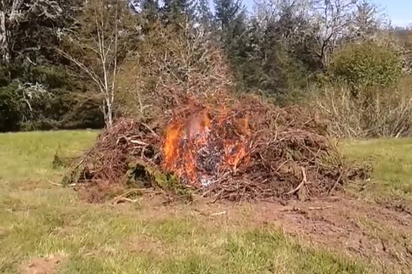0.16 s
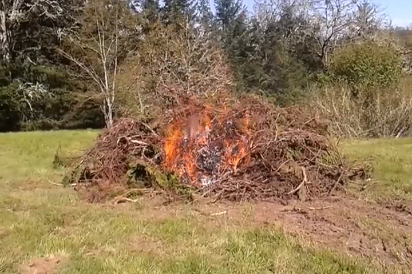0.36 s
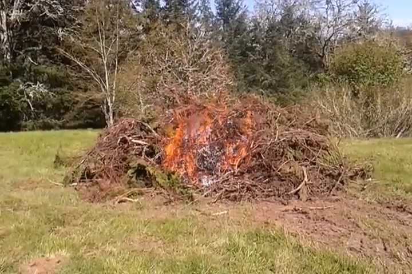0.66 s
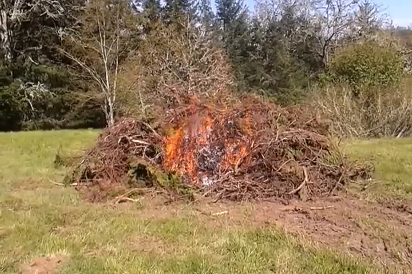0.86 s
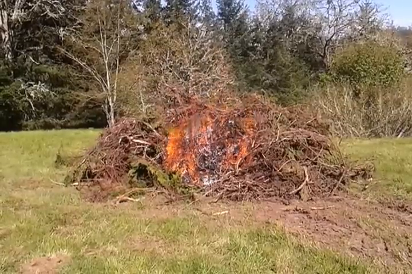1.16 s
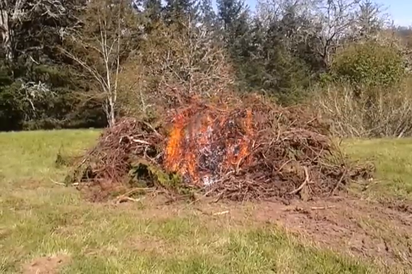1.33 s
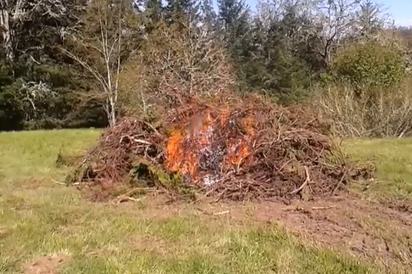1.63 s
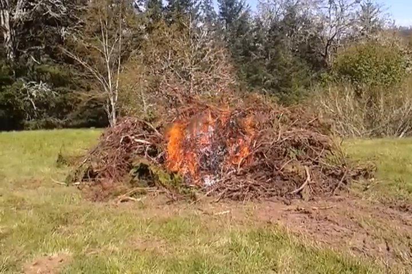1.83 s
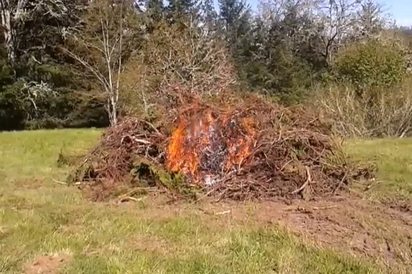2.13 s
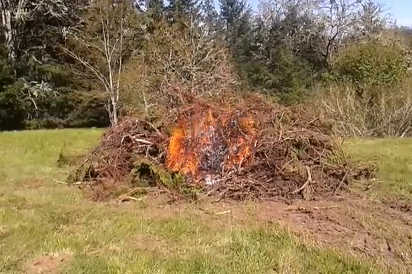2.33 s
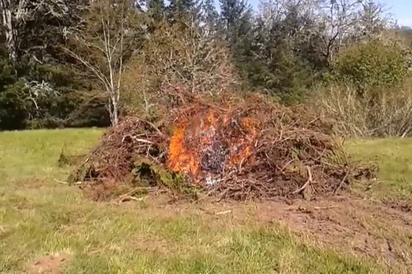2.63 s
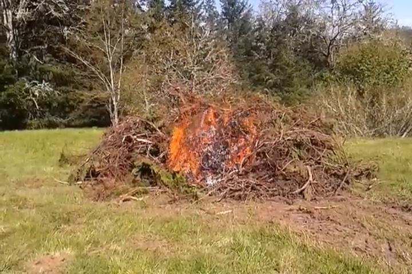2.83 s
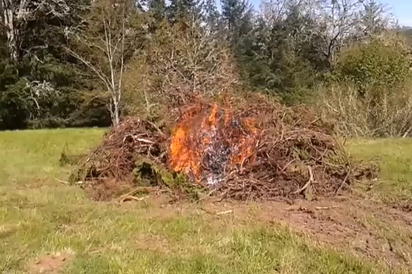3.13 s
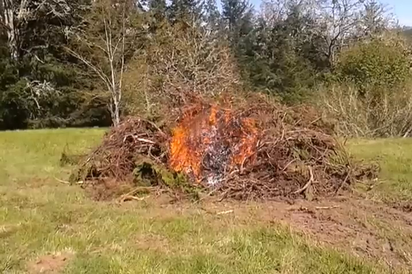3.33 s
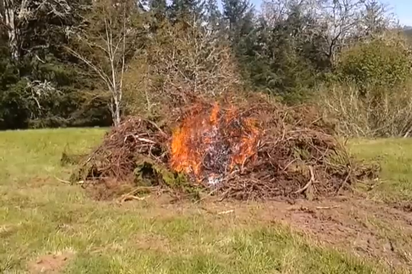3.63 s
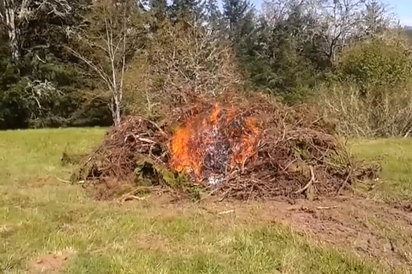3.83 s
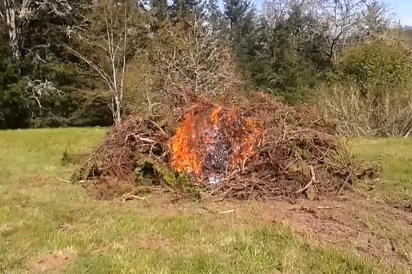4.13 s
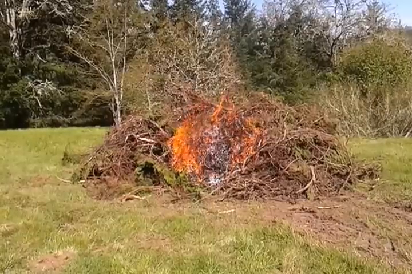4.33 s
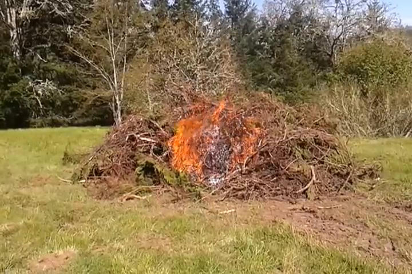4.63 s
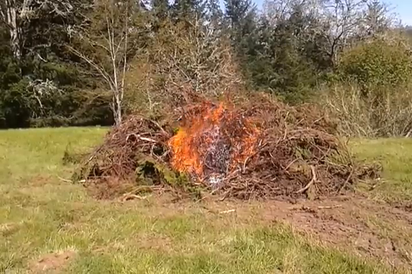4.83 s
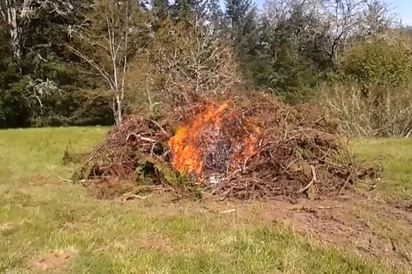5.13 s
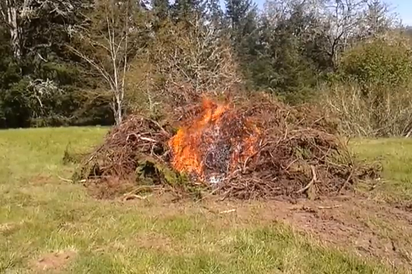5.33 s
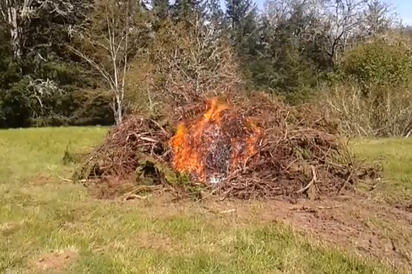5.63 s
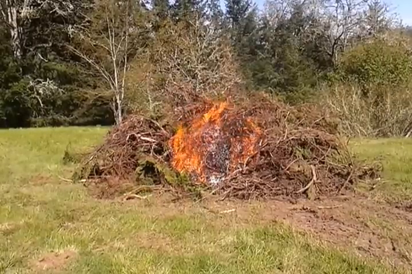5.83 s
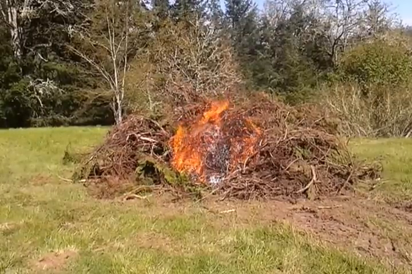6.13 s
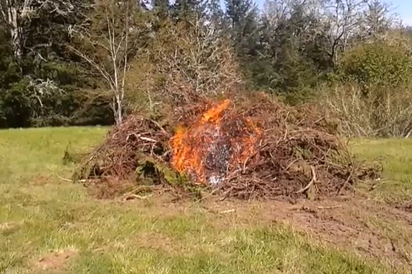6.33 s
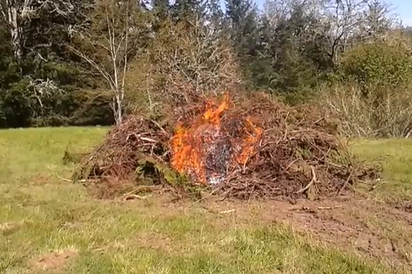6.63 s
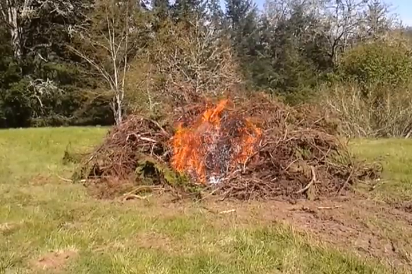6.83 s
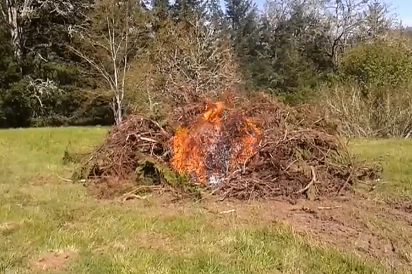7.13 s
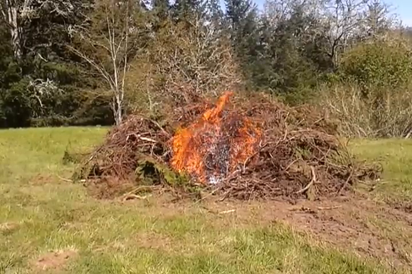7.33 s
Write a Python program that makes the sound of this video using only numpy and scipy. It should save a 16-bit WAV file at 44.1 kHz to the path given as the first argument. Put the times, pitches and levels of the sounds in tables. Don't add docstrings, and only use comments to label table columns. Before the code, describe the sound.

A large pile of green brushwood burns in a meadow, heard from several metres through a small microphone, dry and open with little deep bass and softened, cut-off treble. Throughout, a grainy, flickering hiss of needles and a soft low flame roar carry dense tiny ticks and faint distant crackles. Ragged pops, each only milliseconds long, come irregularly. From 0.6 to 1.6 s they crowd together, with a tiny high steam squeak at 0.8, a loud crack at 0.85 and a swell of hiss around 0.9. Medium snaps follow at 2.0 and 2.55-2.7, then a heavy, woody crack at 3.4. It is sparser around 4 s. A clear pop at 4.9 opens a busy patch of snaps and knocks until 5.7. Two strong cracks almost together at 6.3 and another at 6.67 lead to scattered light crackling until 7.45, with the roar slightly lower.

```python
import sys
import numpy as np
from scipy import signal
from scipy.io import wavfile
from scipy.ndimage import uniform_filter1d

SR = 44100
rng = np.random.default_rng(int(sys.argv[2]) if len(sys.argv) > 2 else 0)


def elevation(decibels):
    levels = np.asarray(decibels, float)
    return 10 ** (levels / 20)


def digitize_waveform(pressure):
    field = np.atleast_2d(pressure).T
    bounded = np.clip(field, -1, 1)
    quanta = np.round(bounded * 32767).astype(np.int16)
    wavfile.write(sys.argv[1], SR, quanta)


N = 328986


def at_hz(points, hz):
    table_hz, table_db = np.transpose(points)
    return np.interp(np.log(hz), np.log(table_hz), table_db)


def rms_one(x):
    return x / np.sqrt(np.mean(x ** 2) + 1e-20)


def band(x, low_hz, high_hz):
    return signal.sosfilt(signal.butter(2, [low_hz, high_hz], "band", fs=SR, output="sos"), x)


def high_pass(x, order, hz):
    return signal.sosfilt(signal.butter(order, hz, "high", fs=SR, output="sos"), x)


def drift(rate_hz):
    hop, settle = 40, 2000
    r = np.exp(-2 * np.pi * rate_hz * hop / SR)
    white = rng.standard_normal(N // hop + settle + 2)
    slow = signal.lfilter([1], [1, -2 * r, r * r], white)[settle:]
    return np.interp(np.arange(N) / hop, np.arange(len(slow)), rms_one(slow))


def coloured(sources, spectrum, patchy_db):
    edges_hz = 22 * 2 ** np.arange(0, 9.1, 0.5)
    out = 0
    for k, (low_hz, high_hz) in enumerate(zip(edges_hz, edges_hz[1:])):
        level_db = at_hz(spectrum, np.sqrt(low_hz * high_hz))
        gain = elevation(level_db + patchy_db * drift(17.4))
        out = out + gain * band(sources[k % len(sources)], low_hz, high_hz)
    return rms_one(out)


def ring(clicks, hz, t60_ms):
    r = elevation(-60000 / (t60_ms * SR))
    w = 2 * np.pi * hz / SR
    return signal.lfilter([0, np.sin(w)], [1, -2 * r * np.cos(w), r * r], clicks + 1e-18)


def every_pop():
    # t/s, level/dB, thick wood body/dB, tilt twig to needle/dB, tear/ms
    big_pops = [(0.6523, -30, -5, 1.6, 1.1), (0.7123, -26, 0, -1, 1.9), (0.7622, -29.3, -6.5, 1.5, 2.2),
                (0.8062, -40, -18.4, 6, 3.0), (0.852, -19.5, -1, -7.5, 1.64), (0.986, -29, 1, 1, 0.81),
                (1.0441, -30, -1, 7, 0.56), (1.1382, -33.5, 10, -12, 1.2), (1.2553, -29.0, -3, 7, 1.2),
                (1.498, -28, -4, -3.6, 3.1), (1.5581, -24.5, -3.0, -3, 3.3), (2.001, -29.5, -12, 3.5, 1.7),
                (2.5643, -27.1, -3.5, 0.5, 3.3), (2.7144, -26.5, -0.5, 0, 3.2),
                (3.3946, -19.5, 4, -1.4, 2.2), (3.8996, -31.5, -0.5, -2, 5.6),
                (4.8981, -23.5, -6.5, 1.5, 2.4), (4.9044, -34, -11, 2.5, 4), (5.092, -29.5, -5.1, -0.5, 3),
                (5.2099, -32.5, -5, 7, 3.7), (5.546, -30.5, -23, 6, 1.6), (6.3177, -22.5, -4, -0.9, 1),
                (6.3384, -20.5, -2.5, -4.5, 2.1), (6.6716, -27.5, -21, 0.5, 1.6)]
    # level/dB of thick wood, twig, bark, needle ranges
    big_colour_db = [-1, -1.5, 4.5, -0.06]
    # t/s, level/dB, tear/ms
    needle_pops = [(0.3493, -39.5, 1.4), (0.4458, -41, 0.65), (1.0554, -42, 2.5), (1.1917, -36, 0.77),
                   (1.2776, -40.3, 1.9), (1.7214, -44.5, 2.4), (1.7253, -41.1, 2.2), (2.1271, -41, 1.7),
                   (2.3183, -43.5, 1.3), (2.367, -39, 1.4), (2.4162, -44.8, 2.5), (2.551, -38.2, 1.1),
                   (3.3213, -39.9, 1.3), (3.345, -40.5, 3), (3.3602, -40.5, 1.6), (3.5117, -38.3, 1.6),
                   (4.1499, -35.5, 0.87), (4.3273, -45, 2.0), (4.4768, -48, 5.3), (4.6678, -39.5, 1.6),
                   (5.5645, -46.5, 3.5), (6.1499, -36.5, 1.1), (6.2105, -39.5, 2.8), (6.222, -38.5, 1.4),
                   (6.2341, -45, 4.0), (6.481, -44, 1.3), (6.9663, -39.5, 1.3), (6.9925, -40.5, 5.5),
                   (7.01, -44, 1.3), (7.4278, -35.5, 2.5)]
    # t/s, level/dB, tear/ms
    bark_pops = [(0.208, -38, 2.0), (0.2694, -41.5, 1.5), (0.5712, -40.5, 2.4), (0.7194, -51, 2.8),
                 (0.88, -35, 1.1), (1.0945, -42, 1.9), (1.6363, -37, 6.8), (2.148, -42, 0.74),
                 (2.4266, -41.5, 1.8), (2.4428, -39, 2.4), (2.4653, -35.2, 2.1), (2.496, -41.5, 1.6),
                 (2.5759, -33, 1.2), (3.1296, -38, 1.9), (3.477, -39.7, 1.3), (4.0005, -43, 2.5),
                 (4.1991, -44.5, 2.3), (5.2182, -35.5, 3.0), (5.2544, -41, 1.4), (5.429, -40, 2.0),
                 (5.4682, -40, 3.8), (5.6687, -45, 2.0), (5.9531, -38.5, 0.82), (5.9827, -40.7, 1.6),
                 (6.0032, -36.5, 1.9), (6.185, -40, 2.1), (6.4595, -38.5, 3), (6.8672, -43, 3.5),
                 (6.9133, -42.5, 5.9), (7.3674, -44, 2.7)]
    # t/s, level/dB, tear/ms
    twig_pops = [(0.1733, -39, 1.9), (0.1929, -32, 1.9), (0.3666, -32, 4.2), (0.3983, -33, 2.9),
                 (0.5147, -35, 1.9), (0.5265, -32.5, 1.4), (0.5526, -40.4, 2.1), (0.844, -31, 1.6),
                 (1.1778, -33, 1.3), (1.4017, -36, 2.1), (1.6519, -34, 1.9), (1.6739, -36, 1.6),
                 (2.0894, -38.5, 2.6), (2.7762, -37.5, 2.1), (3.1354, -31, 1.6), (3.7926, -37, 2.7),
                 (4.3092, -35.7, 2.3), (4.3463, -33, 2.7), (4.7257, -36, 1.7), (5.1497, -35.5, 2.1),
                 (5.2824, -36.5, 2.7), (5.3315, -35.5, 1.5), (5.3992, -35, 1.9), (5.5564, -33, 2.3),
                 (5.648, -37, 2.5), (6.2018, -36, 1.8), (6.6516, -31.5, 1.5), (6.9211, -32, 4.3),
                 (7.2284, -35.5, 1.7), (7.3427, -33, 2.1)]
    # t/s, level/dB, tear/ms
    branch_pops = [(0.5978, -48, 2.6), (0.9091, -42, 1.3), (1.2644, -37, 1.9), (1.6438, -38, 1.2),
                   (1.852, -34.5, 2.4), (2.6906, -35, 1.7), (3.4186, -40.6, 2.8), (3.8578, -38.5, 1.6),
                   (4.3035, -38.5, 5.2), (4.7422, -43, 1), (4.7784, -47, 2.1), (4.9115, -36, 1.4),
                   (4.9689, -37.5, 2.3), (4.9752, -36.5, 2.8), (5.0992, -36, 2.1), (5.276, -46, 2.8),
                   (5.4203, -42, 1.3), (5.4779, -38, 1.9), (5.6069, -42.1, 1.8), (6.3986, -41.3, 1.4)]
    # thick wood/dB, twig/dB, bark/dB, needle/dB
    kind_colours = [
        (-8, -1.5, 9.5, 7),
        (0, -12.5, 7.5, 3.2),
        (-2.5, -0.5, 4.5, -0.2),
        (4, 1, 4.5, -0.5),
    ]
    # t/s, level/dB, brightness/dB
    sparks = [(0.1648, -41, 0), (0.6816, -44, 8), (1.0064, -55, 14), (1.0152, -39, 2.3), (1.7602, -42.5, 4),
              (1.801, -40.5, 1.5), (1.8476, -52, 6.0), (1.9062, -44, 4), (2.154, -45, -7),
              (2.348, -46.5, 8), (2.421, -40, 0), (2.5426, -42, 5.7), (2.6117, -41, 2), (2.747, -46, 7.5),
              (2.8728, -45.5, -3), (2.9636, -45.5, 3.5), (3.2977, -42, 2), (3.3145, -40, 1),
              (3.4322, -42, 4.5), (3.6203, -47, 9), (4.108, -41, 1.5), (4.5472, -40.5, 2),
              (4.889, -43, 2.3), (5.3411, -42.5, -1), (5.4556, -41, 2), (5.711, -48.5, 7),
              (6.0983, -42, -0.1), (6.4502, -47, 11), (6.8976, -41, 1), (7.395, -50, 11)]

    rows = []
    for s, db, body_db, tilt_db, tear_ms in big_pops:
        levels_db = db + np.add(big_colour_db, [body_db, -tilt_db, 0, tilt_db])
        rows.append((s, *levels_db, tear_ms))
    for kind, colour_db in zip([needle_pops, bark_pops, twig_pops, branch_pops], kind_colours):
        for s, db, tear_ms in kind:
            rows.append((s, *np.add(db, colour_db), 0.6 * tear_ms))
    for s, db, lift_db in sparks:
        dark_db, bright_db = db - lift_db, db + lift_db
        rows.append((s, dark_db, dark_db, bright_db + 2.5, bright_db - 1.5, 2.2))

    far_count, far_db, far_spread_db, far_tear_ms = 130, -47, 3, 0.86
    far_s = rng.random(far_count) * N / SR
    far_kind = rng.integers(0, 4, far_count)
    size, length = rng.standard_normal((2, far_count, 1))
    levels_db = far_db + far_spread_db * np.minimum(size, 1) + np.array(kind_colours)[far_kind]
    return np.vstack([rows, np.c_[far_s, levels_db, far_tear_ms * elevation(3.0 * length)]])


def pops(table):
    edges_hz = [600, 1650, 3100, 5800, 8600]
    range_db = [21.53, 19.3, 18.36, 26]
    tail_db, tail_ms, rise_ms = -16.5, 6.5, 0.037
    ragged_db, stretch, crack_db = 3.0, 0.93, 15.0

    ms = np.arange(1400) / SR * 1000
    draws = rng.standard_normal((len(table), 5, len(ms)))
    s, *levels_db, tear_ms = np.transpose(table)
    decay_ms = np.maximum(stretch * tear_ms, 0.3)[:, None]
    tear = np.exp(-(ms / decay_ms) ** 0.96)
    scatter = elevation(tail_db) * np.exp(-ms / tail_ms)
    ragged = elevation(ragged_db * rms_one(uniform_filter1d(draws[:, 4], size=18)))
    shape = (tear + scatter) * ragged * (1 - np.exp(-ms / rise_ms))
    crack = elevation(crack_db) * (ms == 0)
    bursts = 0
    for k, level_db in enumerate(levels_db):
        part = band(draws[:, k] * shape + crack, edges_hz[k], edges_hz[k + 1])
        gain = elevation(level_db + range_db[k]) / np.linalg.norm(part, axis=1)
        bursts = bursts + gain[:, None] * part
    out = np.zeros(N + len(ms))
    for start, burst in zip(np.round(s * SR).astype(int), bursts):
        out[start:start + len(ms)] += burst
    return high_pass(out[:N], 4, 520)


def stems():
    # t/s, f/Hz, level/dB, t60/ms
    stem_rings = [(.7123, 4050, -16.5, 12), (.8066, 8460, -9, 16), (.8522, 2700, -22, 7.9),
                  (.8522, 4080, -15, 11), (1.1385, 2700, -18.5, 12), (1.4992, 3600, -13, 5),
                  (1.5588, 4300, -27, 9.1), (5.0922, 4400, -25, 8), (7.228, 4220, -22, 8),
                  (2.7146, 3440, -9, 7.2), (3.3952, 1200, -29, 12), (3.9007, 1270, -29.5, 18),
                  (.2688, 5030, -26, 10), (4.8985, 685, -21, 16), (6.3395, 1410, -15.5, 15),
                  (4.8985, 4550, -11.5, 12), (4.8985, 5500, -25, 6), (6.3175, 2200, -18, 7.3),
                  (6.3395, 3870, -22, 8), (6.3395, 6360, -8, 8.7), (6.672, 4120, -27, 8)]
    out = 0
    for s, hz, level_db, t60_ms in stem_rings:
        knock = elevation(level_db) * (np.arange(N) == int(s * SR))
        out = out + ring(knock, hz, t60_ms)
    return high_pass(out, 2, 550)


def squeak():
    # f/Hz, level/dB, t60/ms
    steam_jet = (7520, -8.5, 24)
    hz, level_db, t60_ms = steam_jet
    start_s, blow_ms = 0.8063, 1.5
    since_ms = (np.arange(N) / SR - start_s) * 1000
    blowing = (since_ms > 0) * (since_ms < blow_ms)
    jet = ring(rng.standard_normal(N) * blowing, hz, t60_ms)
    return elevation(level_db) * jet / np.abs(jet).max()


def ticks(per_s=320.0, spread_db=2.5, clump_db=4.5, cycles=1.8, level_db=-53.5):
    sizes = elevation(spread_db * np.minimum(rng.exponential(1, N), 3.0)) * rng.choice([-1, 1], N)
    born = rng.random(N) < per_s * elevation(clump_db * drift(8)) / SR
    pitch = rng.integers(0, 10, N)
    snaps = 0
    for k, hz in enumerate(np.geomspace(1600, 8500, 10)):
        snaps = snaps + ring(sizes * born * (pitch == k), hz, cycles * 1000 / hz)
    return elevation(level_db) * rms_one(snaps)


def needles(per_s=700.0, spread_db=4.0, clump_db=5.0, last_ms=0.15, smooth_db=0.6):
    # f/Hz, level per Hz/dB
    hiss_spectrum = [(500, -11.5), (1000, 0), (2200, -6.5), (4000, 0.5), (5500, -4), (7000, 3.5),
                     (9000, -4.5)]
    sizes = elevation(spread_db * np.minimum(rng.exponential(1, N), 3.5))
    born = rng.random(N) < per_s * elevation(clump_db * drift(25)) / SR
    r = np.exp(-1000 / (last_ms * SR))
    power = signal.lfilter([1], [1, -r], sizes ** 2 * born + 1e-12)
    puffs = rms_one(np.sqrt(power))
    envelope = np.sqrt(puffs ** 2 + elevation(smooth_db) ** 2)
    return coloured(rng.standard_normal((2, N)) * envelope, hiss_spectrum, patchy_db=1.13)


def roar():
    # f/Hz, level per Hz/dB
    roar_spectrum = [(25, -38.5), (50, -20), (100, -6), (200, -0.5), (400, -3.5), (800, -2), (1400, -9),
                     (2500, -24.5)]
    return coloured(rng.standard_normal((2, N)), roar_spectrum, patchy_db=0.95)


def scene():
    # t/s, hiss level/dB, roar level/dB
    blaze = [
        (0.0, -47.5, -47),
        (0.87, -44.5, -48.5),
        (1.37, -47.5, -47.5),
        (4.61, -47.5, -48.5),
        (5.15, -47.5, -49),
        (6.5, -48, -49.5),
        (7.46, -48, -48.5),
    ]
    s, hiss_db, roar_db = np.transpose(blaze)
    t = np.arange(N) / SR
    hiss = elevation(np.interp(t, s, hiss_db) + 5.0) * needles()
    flame = elevation(np.interp(t, s, roar_db) + 4.0) * roar()
    return (pops(every_pop()) + stems() + squeak() + ticks() + hiss + flame)[None]


def roll_off(x):
    return signal.sosfilt(signal.butter(12, 10340, fs=SR, output="sos"), x)


def record(dry):
    # f/Hz, width/Hz, gain/dB
    notches = [(446, 299, -11.5), (978, 222, -7), (1748, 374, -7), (3100, 660, -10.5), (4090, 160, 3.5),
               (5930, 515, -8.5), (8036, 690, -24)]
    self_noise_db, dull_hz, top_hz = -98, 6790, 9070
    x = high_pass(dry, 2, 45)
    for hz, width_hz, gain_db in notches:
        w, a = 2 * np.pi * hz / SR, np.pi * width_hz / SR
        g = np.sqrt(elevation(gain_db))
        middle = -2 * np.cos(w)
        x = signal.lfilter([1 + a * g, middle, 1 - a * g], [1 + a / g, middle, 1 - a / g], x)
    x = signal.sosfilt(signal.butter(4, dull_hz, fs=SR, output="sos"), x)
    x = signal.sosfilt(signal.cheby1(8, 0.3, top_hz, fs=SR, output="sos"), x)
    x = x + elevation(self_noise_db) * rng.standard_normal(x.shape)
    return roll_off(x)


dry = scene()
out = record(dry)
digitize_waveform(out)
```